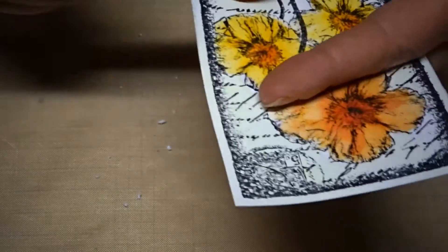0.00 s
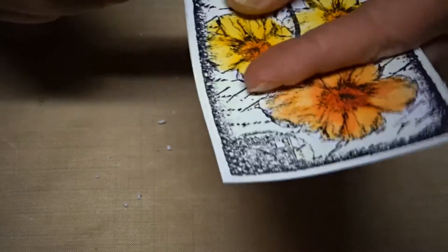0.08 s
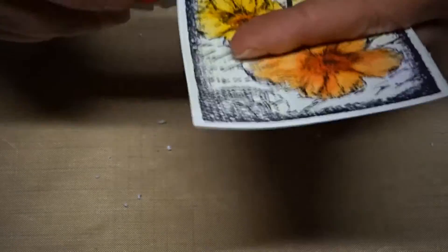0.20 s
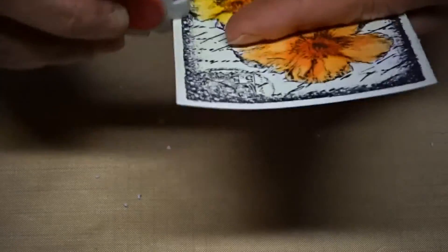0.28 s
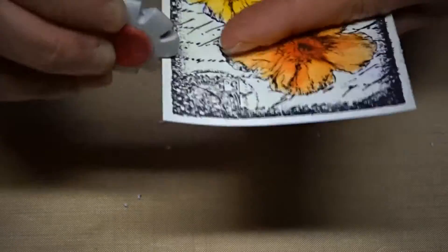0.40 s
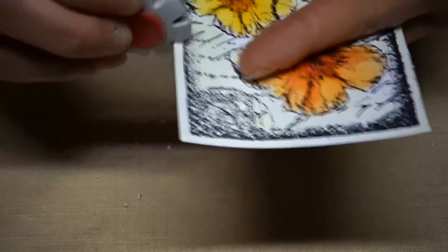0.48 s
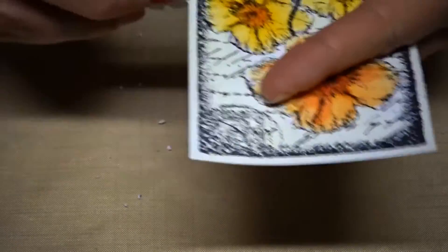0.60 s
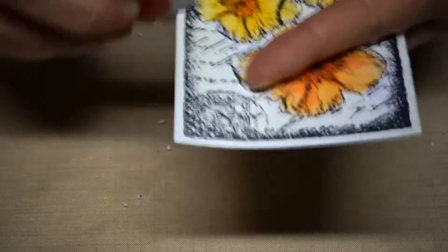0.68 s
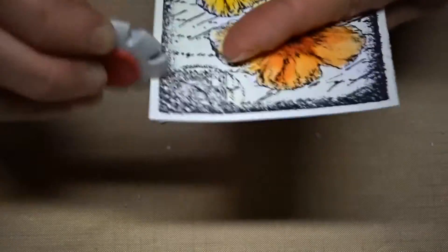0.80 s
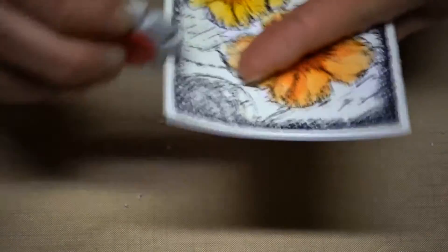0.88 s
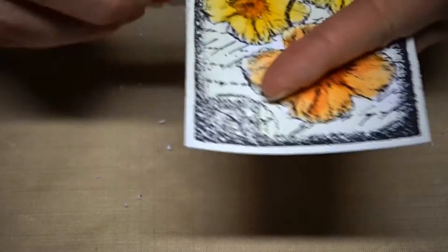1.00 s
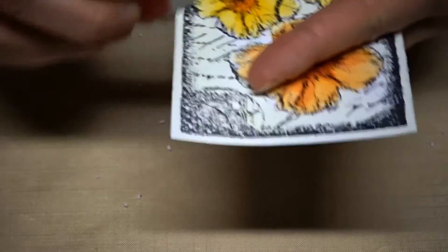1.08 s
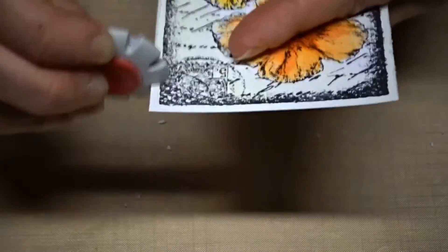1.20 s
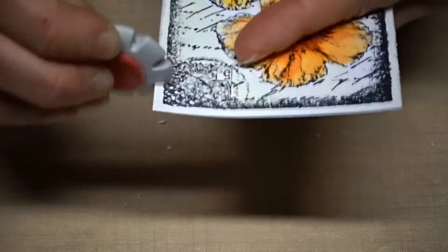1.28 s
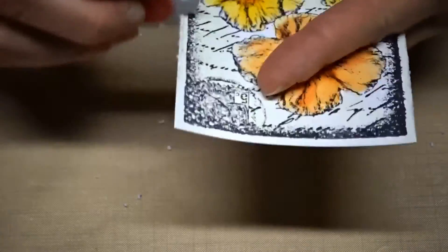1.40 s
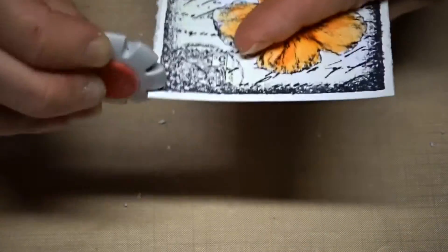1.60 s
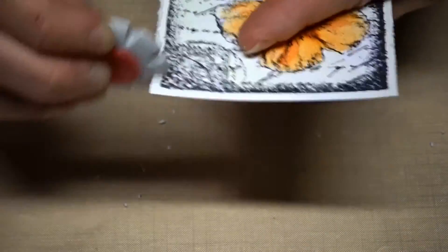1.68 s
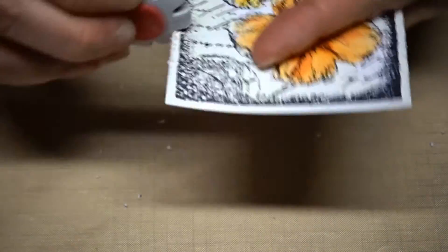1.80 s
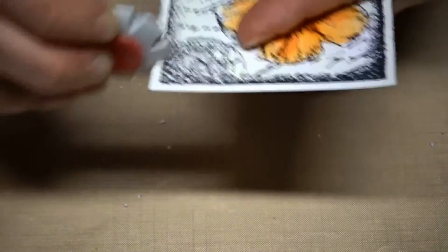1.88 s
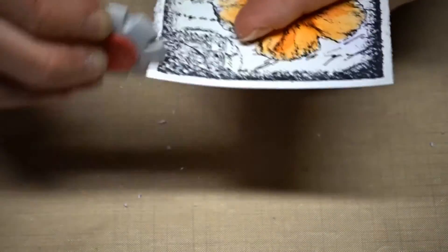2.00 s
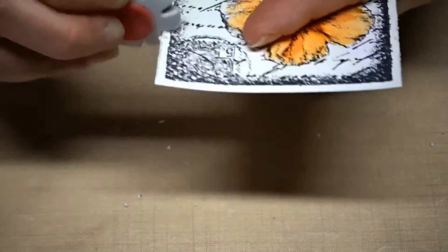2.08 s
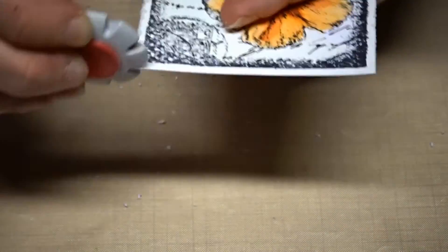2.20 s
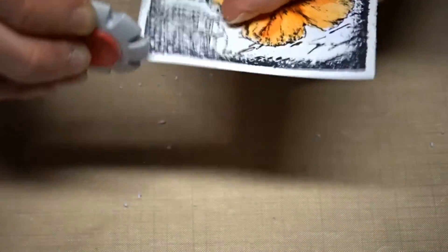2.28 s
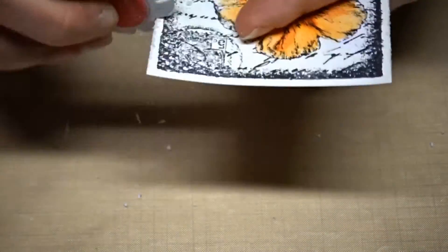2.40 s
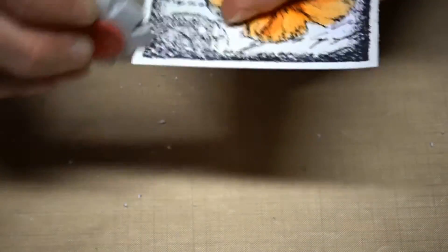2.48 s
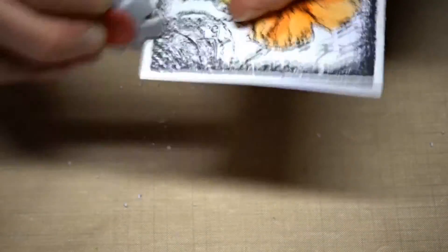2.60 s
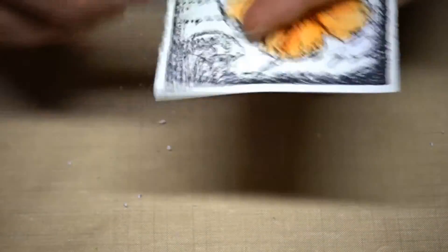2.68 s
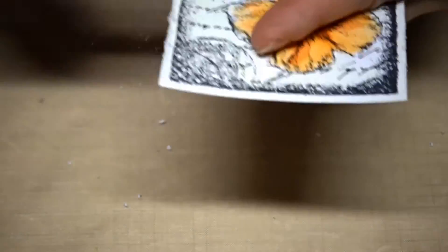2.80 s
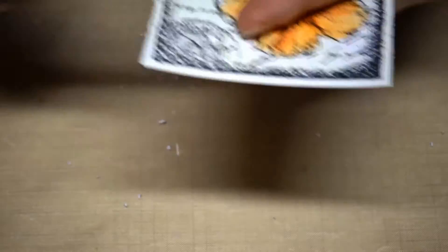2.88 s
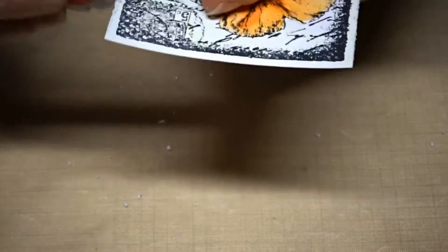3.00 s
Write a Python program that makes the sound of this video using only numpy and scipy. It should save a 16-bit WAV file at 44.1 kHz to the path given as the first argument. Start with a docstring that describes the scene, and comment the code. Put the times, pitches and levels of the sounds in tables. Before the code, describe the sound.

Dry, gritty scraping of stiff card edge, short uneven strokes, occasional clicks as it springs free

```python
"""Faint mains hum and room air run throughout; a tool brushes lightly over a hand-held paper card. A tuft or
two of fibres tears off, then a small blade scrapes the card's edge in eighteen short strokes. Each stroke is
stick and slip: jerks bunch tiny fibre breaks, which drive the card's resonances. In some pulls the edge or the
flexing card rings with a gliding note; later the bent card rebounds with a low ring and snaps off the blade
with a ring and a crack. A small room answers the card."""
import sys
import numpy as np
from scipy import signal
from scipy.fft import rfft, irfft, next_fast_len
from scipy.io import wavfile
from scipy.ndimage import uniform_filter1d, map_coordinates

SR = 44100
rng = np.random.default_rng(int(sys.argv[2]) if len(sys.argv) > 2 else 0)


def put_to_file(sound):
    """Save the sound as 16-bit audio at rate SR, in the file named by the first command-line argument."""
    columns = np.atleast_2d(sound).T  # one column per channel
    safe = np.clip(columns, -1, 1)
    whole_steps = np.round(safe * 32767)
    wavfile.write(sys.argv[1], SR, whole_steps.astype(np.int16))


N = 134505


def amp(db):
    """Decibels to gain."""
    return 10 ** (np.asarray(db) / 20)


def unit(x):
    """x at rms 1."""
    return x / np.sqrt(np.mean(x ** 2) + 1e-20)


def along(points, hz):
    """(f/Hz, value) points read on a log frequency axis."""
    f, v = np.transpose(points)
    return np.interp(np.log(hz + 1), np.log(f + 1), v)


def coloured(x, points, rings=()):
    """x through a minimum-phase filter of unit energy: broad colour plus narrow resonances."""
    m = 2 * next_fast_len(N)
    hz = np.fft.rfftfreq(m, 1 / SR)
    db = along(points, hz)
    for f, width_hz, lift_db in rings:
        db = db + lift_db / (1 + (2 * (hz - f) / width_hz) ** 2)
    db = db + 10 * np.log2(np.clip(hz / points[0][0], .1, 1))  # 10 dB/octave fall below the first point
    # folding the cepstrum makes the filter causal
    cepstrum = irfft(np.log(unit(amp(db))), m)
    cepstrum[1:m // 2] *= 2
    cepstrum[m // 2 + 1:] = 0
    return irfft(rfft(x, m) * np.exp(rfft(cepstrum)), m)[..., :N]


def even(swing):
    """Divide a swing by its running rms, so its level stays near 1."""
    return swing / np.sqrt(np.abs(uniform_filter1d(swing ** 2, size=600)) + 1e-9)


def burst(start_s, swell_s):
    """An envelope that peaks at 1, swell_s after its start, and dies away."""
    age = np.maximum(np.arange(N) / SR - start_s, 0) / swell_s
    return age * np.exp(1 - age)


def resonance(x, hz, width_hz):
    """x through a two-pole-steep resonance whose centre follows hz: shift to 0 Hz, low-pass, shift back."""
    turn = np.exp(2j * np.pi * np.cumsum(hz) / SR)
    pole = np.exp(-np.pi * width_hz / SR)
    swing = (signal.lfilter([1], np.poly([pole, pole]), x / turn) * turn).real
    return swing * 2 * np.sqrt(2) * (1 - pole) ** 1.5


# room air colour: f/Hz, relative level/dB
AIR_COLOUR = [(25, -16.5), (130, -9.5), (600, -16.5), (1700, -26.5), (15000, -40)]
AIR_DB, HUM_HZ, HUM_DB = -65.5, 98.2, -72.5


def background():
    """Still room air, partly shared by both channels, and a mains hum as a steady sine."""
    noise = rng.standard_normal(N) + 0.43 * rng.standard_normal((2, N))
    hum = np.sin(2 * np.pi * HUM_HZ * np.arange(N) / SR)
    return amp(AIR_DB) * unit(coloured(noise, AIR_COLOUR)) + amp(HUM_DB) * unit(hum)


MEDIAN_SLIPS_PER_S, SLIP_JITTER, SLIP_SCATTER_DB = 230, .65, 1.8  # jitter: sd of log interval
SLIP_RISE_S, TEAR_S = 0.00043, 0.0025  # time constants


def slips():
    """Stick and slip: uneven jerks that each build and die away quickly; rms 1."""
    draw = rng.standard_normal((4000, 2))
    intervals = np.exp(SLIP_JITTER * draw[:, 0]) * SR / MEDIAN_SLIPS_PER_S
    at = np.cumsum(intervals).astype(int)
    jerks = np.bincount(at[at < N], amp(SLIP_SCATTER_DB * draw[at < N, 1]), N)
    poles = np.exp(-1 / (np.array([SLIP_RISE_S, TEAR_S]) * SR))
    return unit(signal.lfilter([1], np.poly(poles), jerks))


FIBRES_PER_S, FIBRE_SCATTER_DB = 11000, 2.5


def fibres(jerks, drag):
    """Tiny fibre breaks, bunched on slips over a steady drag, divided by their running rms to keep level even."""
    breaks = (rng.random(N) < FIBRES_PER_S / SR) * rng.standard_normal(N)
    breaks = breaks * amp(FIBRE_SCATTER_DB * rng.standard_normal(N))
    force = breaks * (jerks + drag)
    return force / np.sqrt(np.abs(uniform_filter1d(force ** 2, size=800)) + 1e-9)


# light sliding, between the strokes: t/s, level/dB
SLIDE = [(.03, -72), (.11, -55), (.5, -49), (.69, -61), (.92, -54), (1.1, -57.5), (2.35, -66.5),
         (2.82, -51), (2.891, -68.5)]
# sliding colour: f/Hz, relative level/dB
SLIDE_COLOUR = [(450, 0), (2350, 0.5), (2800, -3), (15000, -20.5)]
# narrow card resonances, also in the scrape: f/Hz, width/Hz, lift/dB
RINGS = [(318.5, 38, 5), (408.4, 20.5, 6), (1583, 27, 8.5)]


def sliding():
    """Tool and fingers brush lightly over the card, breaking fibres with a strong steady drag."""
    level_db = np.interp(np.arange(N) / SR, *np.transpose(SLIDE))
    return coloured(fibres(slips(), drag=1.0) * amp(level_db), SLIDE_COLOUR, RINGS)


# room decay time to -60 dB: f/Hz, T60/s
ROOM_T60 = [(200, 0.37), (12000, 0.15)]
# room width: f/Hz, side level re mid/dB
ROOM_SIDE = [(400, -21), (1200, -10), (2500, 0.5)]
# room colour: f/Hz, level/dB
ROOM_COLOUR = [(400, -9.5), (3000, -13.5), (10000, -6.5)]


def room_tail():
    """A short (mid, side) noise tail, nearly mono in the bass and wide in the treble."""
    hz, t, z = signal.stft(rng.standard_normal((2, SR // 2)), SR, nperseg=256)
    decay = amp(-60 * t / along(ROOM_T60, hz)[:, None])
    decay /= np.sqrt(np.sum(decay ** 2, axis=1, keepdims=True) * t[1] * SR)  # unit energy per band
    gains = amp(along(ROOM_COLOUR, hz) + np.array([0 * hz, along(ROOM_SIDE, hz)]))
    tail = signal.istft(z * decay * gains[..., None], SR, nperseg=256)[1]
    return np.pad(tail, ((0, 0), (SR // 400, 0)))  # 2.5 ms pre-delay


def room(x, count=10):
    """Each stretch gets a fresh noise tail, so no single draw colours the whole room."""
    wet = np.zeros((2, N + SR))
    for stretch in np.array_split(np.arange(N), count):
        answer = signal.fftconvolve(x[None, stretch], room_tail(), axes=1)
        wet[:, stretch[0]:stretch[0] + answer.shape[1]] += answer
    mid, side = wet[:, :N]
    return np.array([mid + side, mid - side])


# tufts of fibres torn off the edge: t/s, level/dB
TUFTS = [(.197, -35), (.21, -36.5), (.268, -30.5), (1.38, -30), (1.945, -33.5), (2.765, -30)]
# crack colour, shared with the snaps: f/Hz, relative level/dB
CRACK_COLOUR = [(600, 2), (1700, 7), (2750, -8), (4200, 2.5), (5800, -13), (15000, -22)]
TUFT_SWELL_S = 0.0015


def tufts():
    """A whole tuft of fibres tears off the edge: a short noise crack."""
    crack = sum(amp(db) * burst(start_s, TUFT_SWELL_S) for start_s, db in TUFTS)
    return coloured(crack * rng.standard_normal(N), CRACK_COLOUR)


# strokes: t/s, length/s, crest/share of length, rise to crest/dB, fall after crest/dB,
# then crest levels before lean: body/dB, flex/dB, crackle/dB, rasp/dB, fizz/dB
STROKES = [ (0.22, 0.13, 0.35, 5, 7.5, -40.5, -44.5, -45.5, -38.5, -56),
           (0.347, 0.12, 0.66, 2.5, 9.5, -45, -41, -40, -40.5, -50),
           (0.524, 0.14, 0.18, 7.5, 9.5, -38, -43, -36.5, -37.5, -49.5),
           (0.724, 0.14, 0.85, 4.5, -2, -42.5, -41.5, -37.5, -40, -50),
           (0.961, .12, 0.46, -3.5, 18.5, -38.5, -42.5, -33, -34, -45.5),
           (1.134, .16, .8, 9.5, 7.5, -40, -40.5, -36.5, -38.5, -48.5),
           (1.368, 0.052, 0.43, 11.5, 14, -38.5, -34.5, -33.5, -33, -44.5),
           (1.439, 0.062, 0.23, 1, 15.5, -33.5, -36, -33, -36, -48),
           (1.535, 0.16, 0.44, 8.5, 7, -42.5, -37.5, -39.5, -40.5, -52.5),
           (1.742, .11, .39, 7, 15, -40, -35, -40, -39.5, -49.5),
           (1.901, 0.11, 0.66, 12, 7, -45, -38.5, -43, -43, -52.5),
           (2.066, 0.083, 0.71, -1, 6, -45, -43, -47, -47, -55),
           (2.201, 0.088, 0.6, 6.5, -0.5, -44.5, -39.5, -46, -47, -57.5),
           (2.38, 0.085, 0.21, -14, 15.5, -41.5, -36.5, -36.5, -44, -52),
           (2.499, 0.1, 0.69, 6, 15, -46.5, -38.5, -48, -45, -53.5),
           (2.651, 0.036, 0.39, -14.5, 5, -38.5, -32, -46, -42.5, -49.5),
           (2.704, 0.04, .57, 30, 23, -32, -46, -35, -34.5, -35.5),
           (2.735, 0.058, 0.59, 10, 11.5, -38.5, -41, -37, -35.5, -47.5)]
BITE_S, LIFT_S = 0.0056, 0.013  # catch: linear rise; release: falls by e^2 in LIFT_S


def pressure(part, lean_db):
    """Each stroke bites, arches over its crest and lifts; lean_db tilts a part toward the stroke's end."""
    t, power = np.arange(N) / SR, np.zeros(N)
    for start_s, length_s, crest, rise_db, fall_db, *levels_db in STROKES:
        u = np.clip((t - start_s) / length_s, 0, 1)
        crest = np.clip(crest, .05, .95)
        before = np.maximum(1 - u / crest, 0)
        after = np.maximum(u - crest, 0) / (1 - crest)
        arch_db = -rise_db * before ** 1.5 - fall_db * after ** 2
        bite = np.clip((t - start_s) / BITE_S, 0, 1)
        lift = np.exp(-2 * np.maximum(t - start_s - length_s, 0) / LIFT_S)
        power += (bite * lift * amp(levels_db[part] + arch_db + lean_db * (u - 1.0))) ** 2
    return np.sqrt(power)


def travel():
    """Time since the middle of the current stroke (s), held while the blade is lifted."""
    t, since = np.arange(N) / SR, np.zeros(N)
    for start_s, length_s, *_ in STROKES:
        since = np.where(t >= start_s, np.clip(t - start_s, 0, length_s) - length_s / 2, since)
    return since


ECHO_S, ECHO_SHARE, ECHO_OCTAVES_PER_S = .0016, .5, 4  # delay at mid-stroke, gain, shortening rate


def swept(x):
    """x meets its ever sooner echo from the card's end, so its colour sweeps upward through each stroke."""
    delay_s = ECHO_S * 2 ** (-ECHO_OCTAVES_PER_S * travel())
    echo = map_coordinates(x, [np.arange(N) - SR * delay_s])
    return (x + ECHO_SHARE * echo) / np.hypot(1, ECHO_SHARE)


# mid-stroke flexing note, sinking as the blade works toward the corner: t/s, f/Hz
FLEX_HZ = [(1.6, 884), (2.65, 820)]
FLEX_OCTAVES_PER_S = 3.4


def flex_pitch():
    """Within each stroke the flexing note rises as the blade travels."""
    mid_stroke_hz = np.interp(np.arange(N) / SR, *np.transpose(FLEX_HZ))
    return mid_stroke_hz * 2 ** (FLEX_OCTAVES_PER_S * travel())


# band in which the card radiates its flexing: low f/Hz, high f/Hz
FLEX_BAND_HZ = (730, 1540)
FLEX_POLE_WIDTH_HZ = 337


def flexing(force):
    """The card chatters at its flexing note, a moving resonance heard through a fixed band."""
    band = signal.butter(3, FLEX_BAND_HZ, "bandpass", fs=SR, output="sos")
    return even(signal.sosfilt(band, resonance(force, flex_pitch(), FLEX_POLE_WIDTH_HZ)))


# colours of what the slips excite: f/Hz, relative level/dB
BODY = [(90, -65.5), (190, -13), (320, 1), (430, -1), (560, -8.5), (750, -1), (1300, -42.5)]
CRACKLE = [(500, -16), (900, -14.5), (1300, -0.5), (1830, -7), (2250, -8.5), (2600, -13), (4000, -74.5)]
RASP = [(1800, -12.5), (2800, -8), (3100, -2), (4300, 1.5), (5000, -3.5), (5500, -10.5), (6300, -10.5),
        (8000, -20.5), (13000, -34)]
FIZZ = [(3500, 6), (6800, 0.5), (11000, -1.5), (15000, -5)]
LOCAL_SLIPS = 0.51  # slips felt by one part only, re the shared ones


def scraping():
    """The slips drive the card's low body, its flexing, the crackle, the rasp of the edge and fibre fizz."""
    jerks = slips()

    def tearing(drag):
        """Fibre breaks on shared and local slips, with the card-end echo."""
        return swept(fibres(jerks + LOCAL_SLIPS * slips(), drag))

    body, flex, crackle, rasp, fizz = range(5)
    return (coloured(tearing(drag=0.32) * pressure(body, lean_db=-1.5), BODY, RINGS)
            + flexing(tearing(drag=0.27)) * pressure(flex, lean_db=0.5)
            + coloured(tearing(drag=1.0) * pressure(crackle, lean_db=0.0), CRACKLE, RINGS)
            + coloured(tearing(drag=0.4) * pressure(rasp, lean_db=3.0), RASP)
            + coloured(tearing(drag=0.49) * pressure(fizz, lean_db=1.5), FIZZ))


# gliding notes, from the free edge and, at the low pitches, from the flexing card: start t/s, end t/s, start
# f/Hz, end f/Hz, level/dB
GLIDING_NOTES = [(.226, .33, 2150, 2400, -41), (.37, .465, 2600, 3300, -41), (.81, .882, 700, 1250, -35),
                 (1.215, 1.3, 720, 1150, -38.5), (2.386, 2.447, 1750, 1850, -42),
                 (2.757, 2.792, 1800, 800, -37)]
GLIDE_Q = 4.5  # mean pitch over pole width


def gliding_notes():
    """Brief notes ring and glide as the blade travels: the short free edge up high, the flexing card lower
    down."""
    force, total = fibres(slips(), drag=0.54), np.zeros(N)
    for start_s, end_s, from_hz, to_hz, db in GLIDING_NOTES:
        u = np.clip((np.arange(N) / SR - start_s) / (end_s - start_s), 0, 1)
        swell = amp(db) * np.sqrt(np.abs(np.sin(np.pi * u)))
        glide_hz = from_hz * (to_hz / from_hz) ** u
        width_hz = np.sqrt(from_hz * to_hz) / GLIDE_Q
        total += swell * even(resonance(force, glide_hz, width_hz))
    return total


# the bent card springs back: t/s, f/Hz, level/dB
REBOUNDS = [(.772, 430, -37), (.956, 420, -30.5), (1.4, 427, -29), (2.721, 315, -33)]
REBOUND_SWELL_S = 0.0083


def rebounds():
    """A short hollow ring of the whole card: a low sine burst."""
    t, ring = np.arange(N) / SR, np.zeros(N)
    for start_s, hz, db in REBOUNDS:
        ring += amp(db) * burst(start_s, REBOUND_SWELL_S) * np.sin(2 * np.pi * hz * (t - start_s))
    return ring


# the card snaps off the blade: t/s, f/Hz, swell/s, ring level/dB, crack level/dB
SNAPS = [(.9545, 1310, 0.0015, -15, -20.5), (1.4332, 1460, 0.0025, -26.5, -19),
         (2.1208, 1230, .0015, -26, -37.5), (2.3824, 1240, 0.00069, -13.5, -22.5),
         (2.6842, 850, 0.0015, -19.5, -34), (2.7235, 975, 0.0027, -28.5, -25.5)]


def snaps():
    """The snagged card springs free with a few cycles of ring and a noise crack."""
    t, ring, crack = np.arange(N) / SR, np.zeros(N), np.zeros(N)
    for start_s, hz, swell_s, ring_db, crack_db in SNAPS:
        shape = burst(start_s, swell_s)
        ring += amp(ring_db) * shape ** 2 * np.sin(2 * np.pi * hz * (t - start_s))
        crack += amp(crack_db) * shape ** 1.7
    return ring + coloured(crack * rng.standard_normal(N), CRACK_COLOUR)


def scene():
    """The card sits just right of centre, with its room and the background around it."""
    card = sliding() + tufts() + scraping() + gliding_notes() + rebounds() + snaps()
    return card * amp([[-.25], [.25]]) + room(card) + background()


TOP_HZ = 15150


def record(dry):
    """A sharp band limit: nothing passes at or above TOP_HZ."""
    m = next_fast_len(N + SR // 2)
    return irfft(rfft(dry, m) * (np.fft.rfftfreq(m, 1 / SR) < TOP_HZ), m)[:, :N]


dry = scene()
out = record(dry)
put_to_file(out)
```